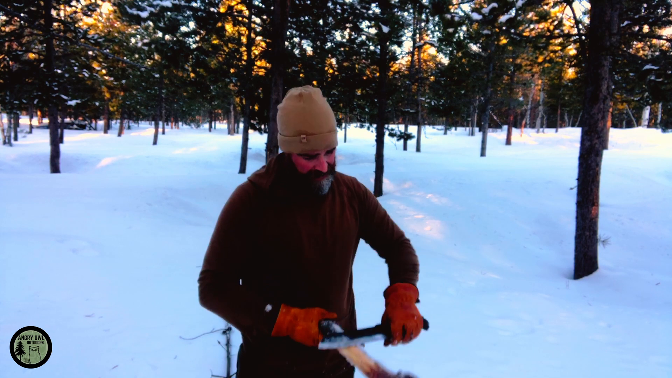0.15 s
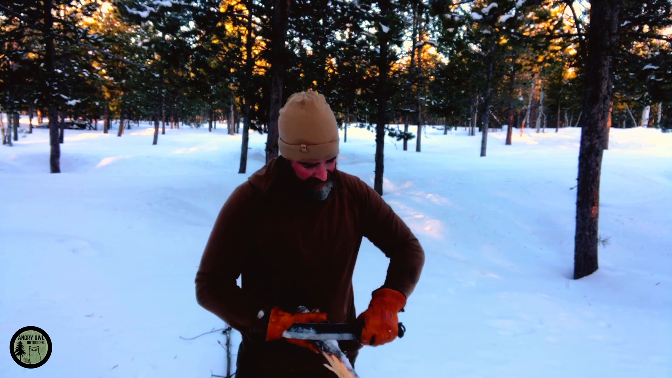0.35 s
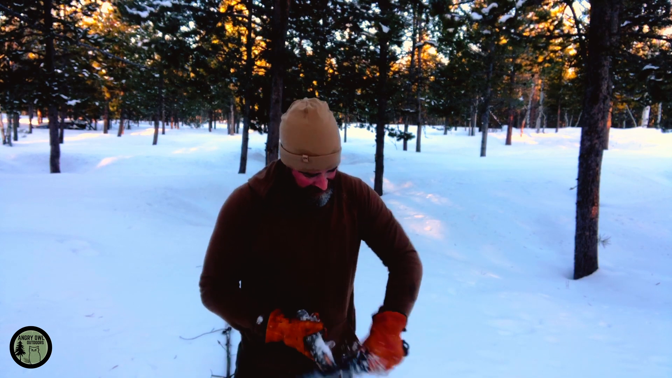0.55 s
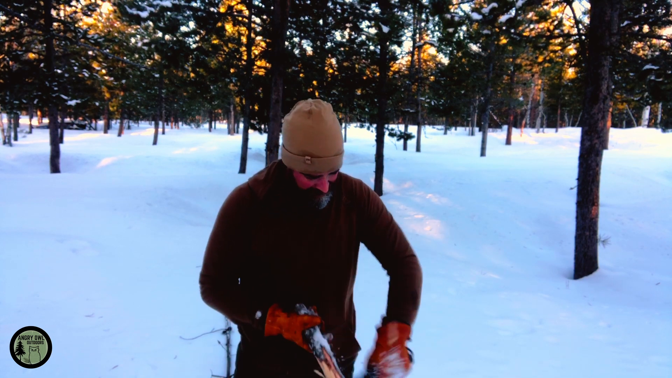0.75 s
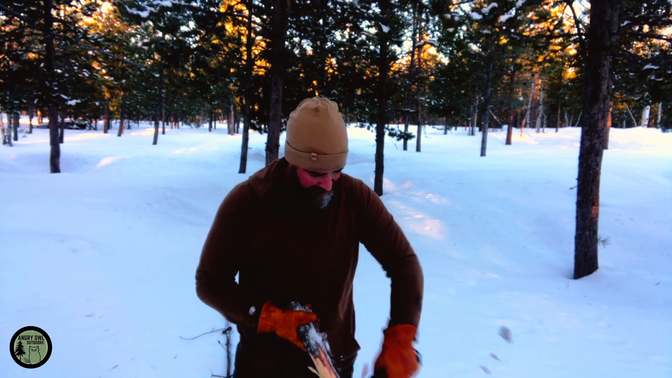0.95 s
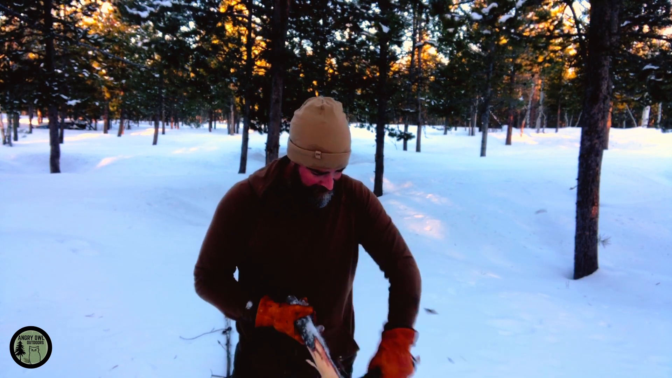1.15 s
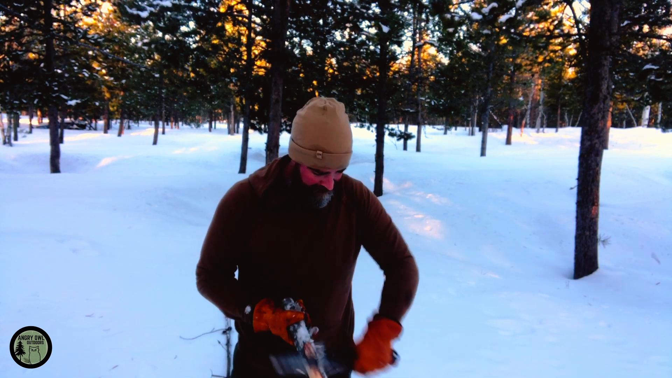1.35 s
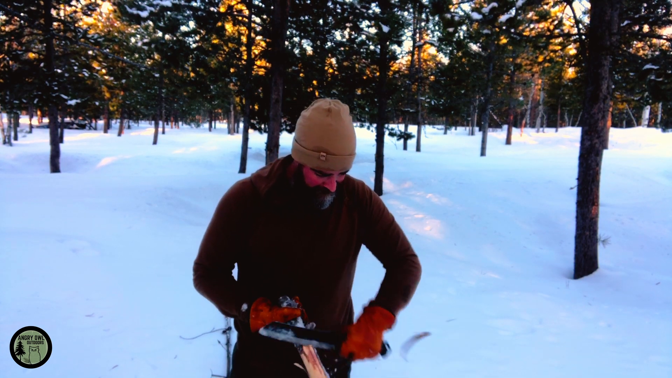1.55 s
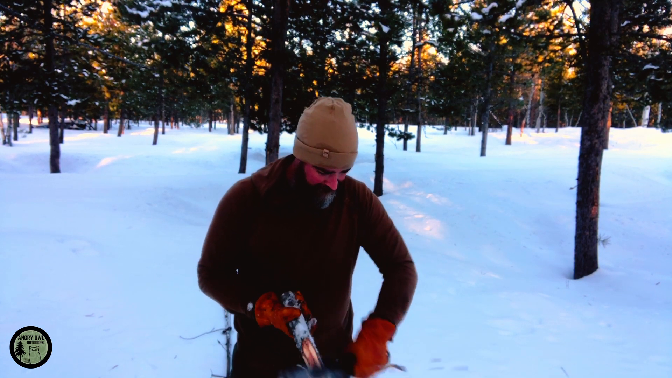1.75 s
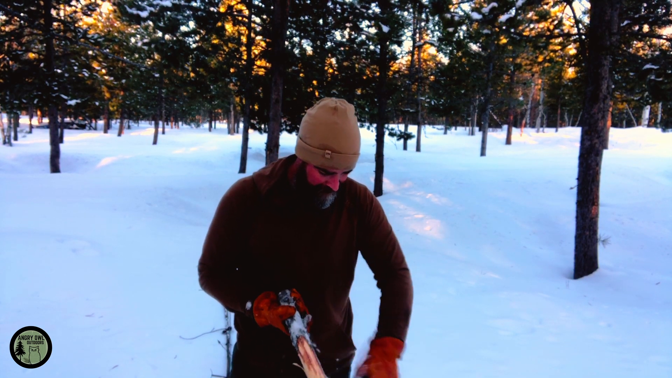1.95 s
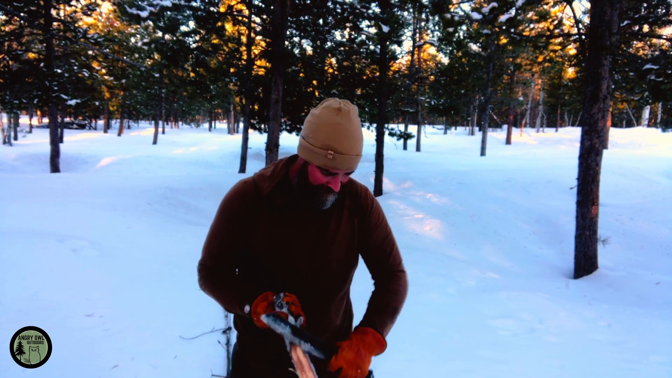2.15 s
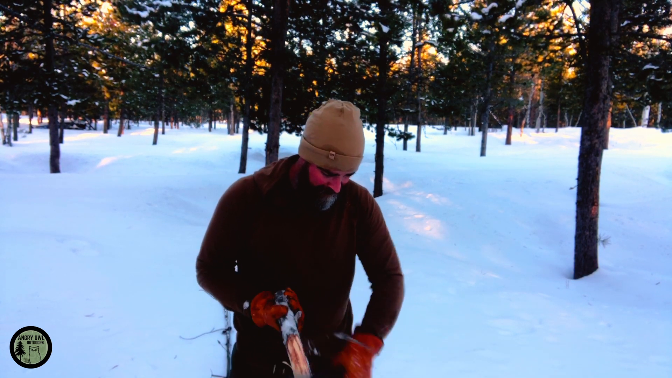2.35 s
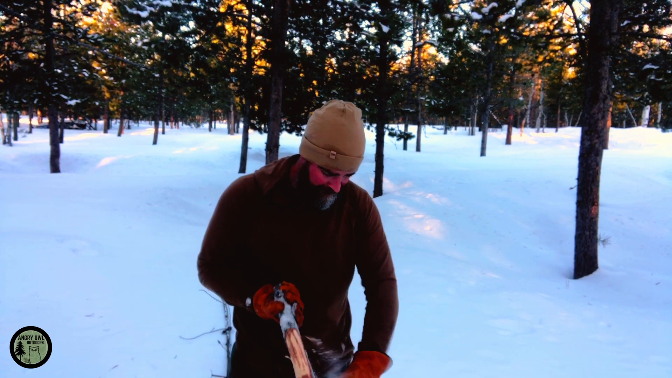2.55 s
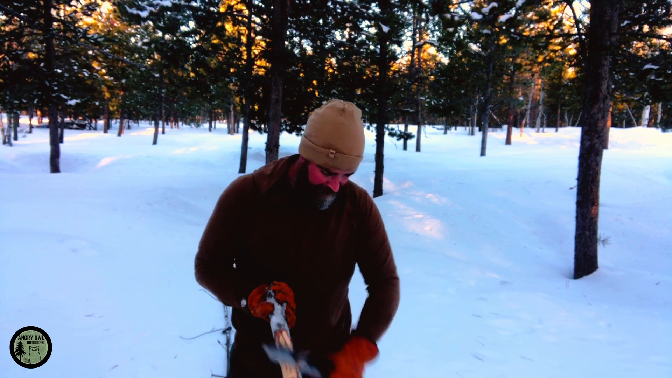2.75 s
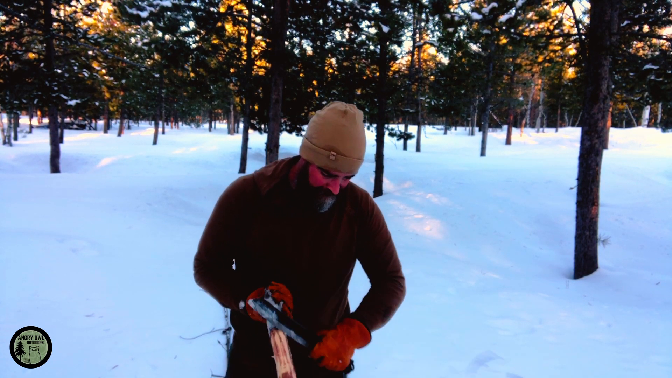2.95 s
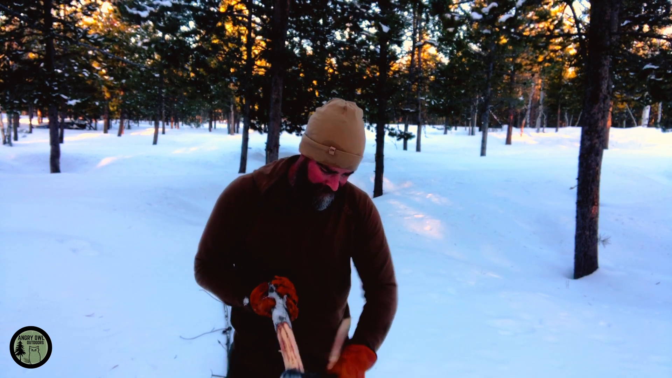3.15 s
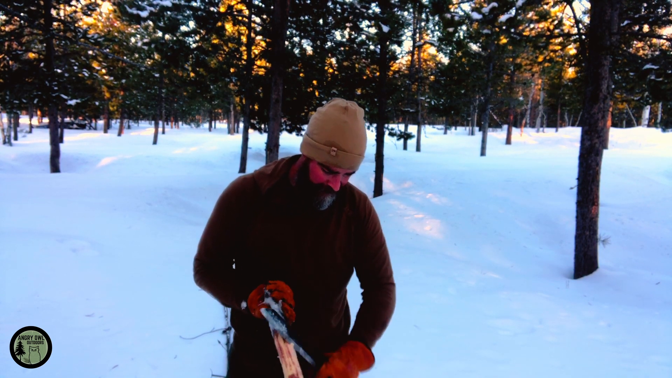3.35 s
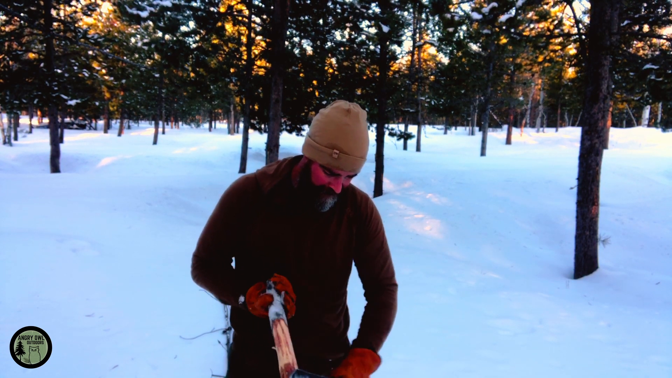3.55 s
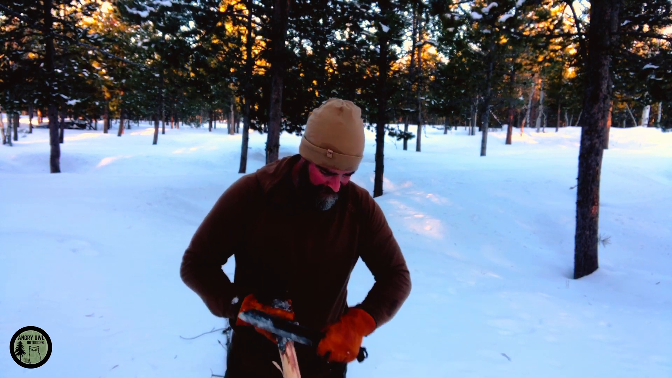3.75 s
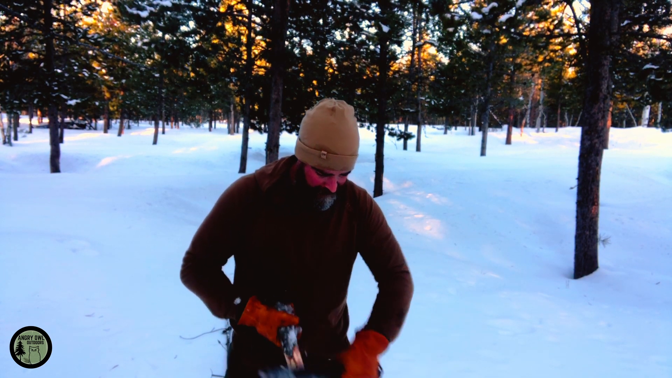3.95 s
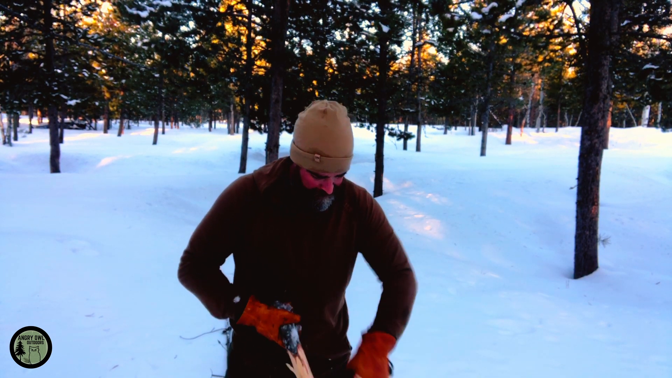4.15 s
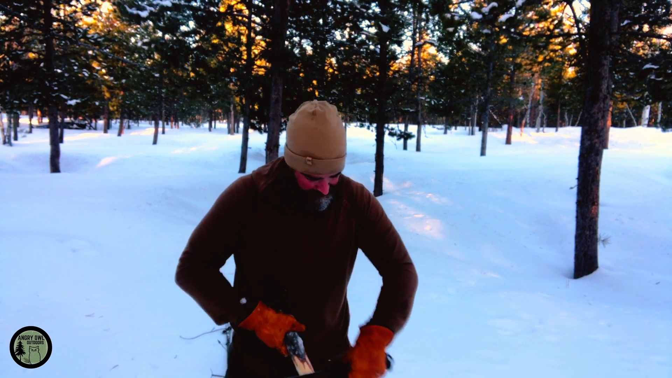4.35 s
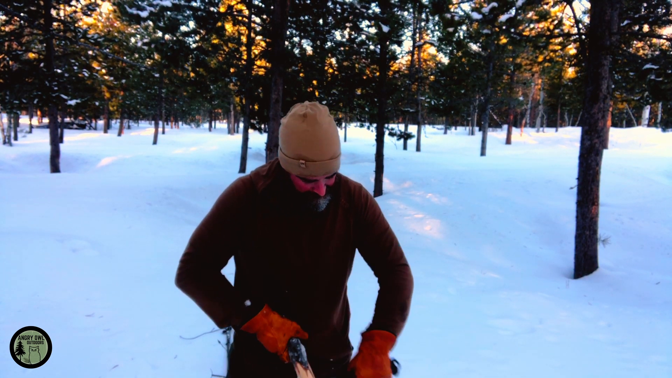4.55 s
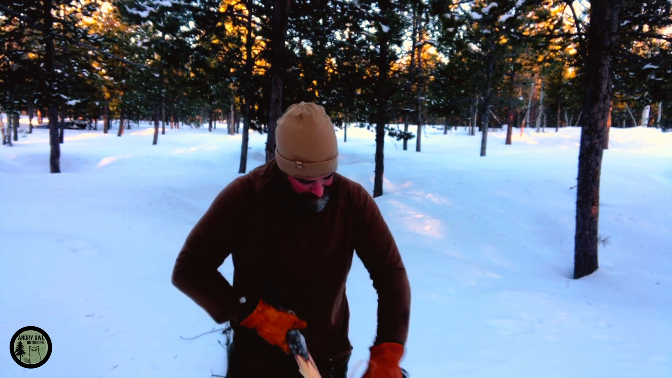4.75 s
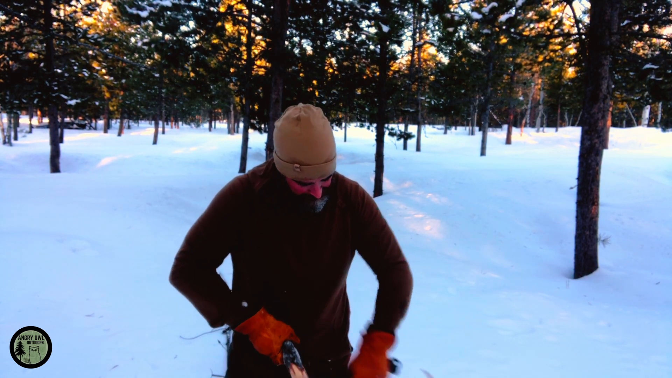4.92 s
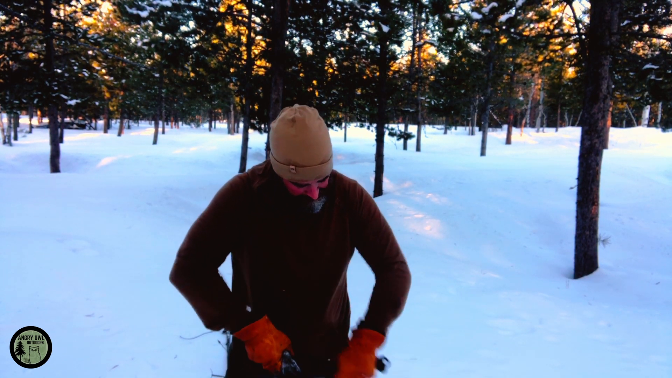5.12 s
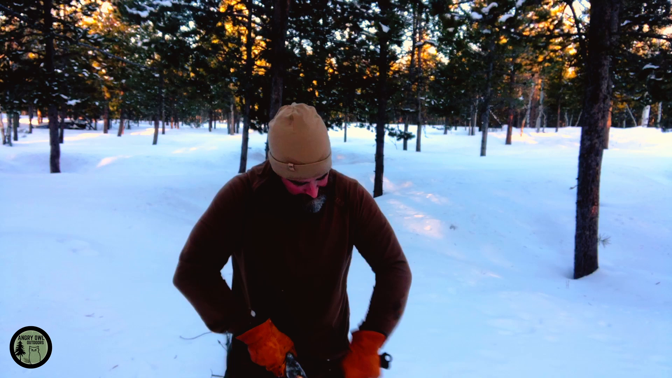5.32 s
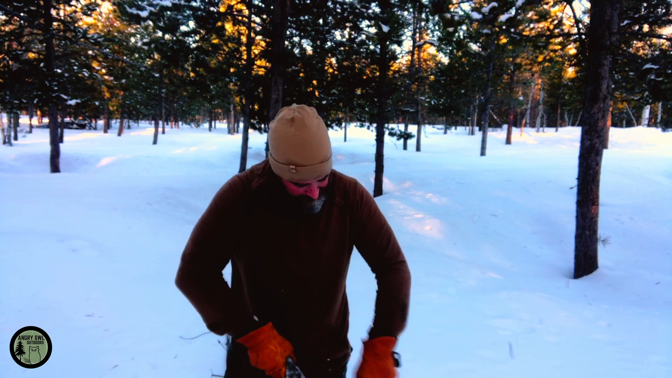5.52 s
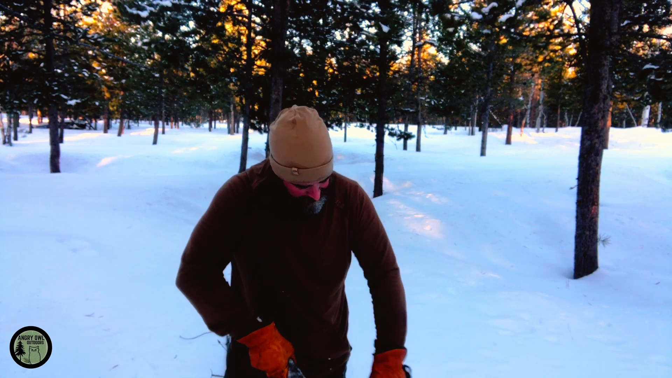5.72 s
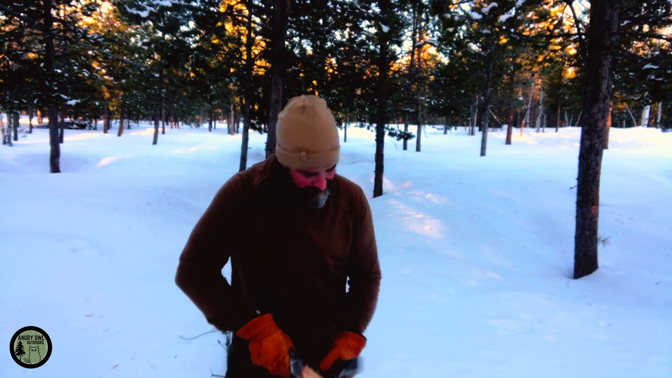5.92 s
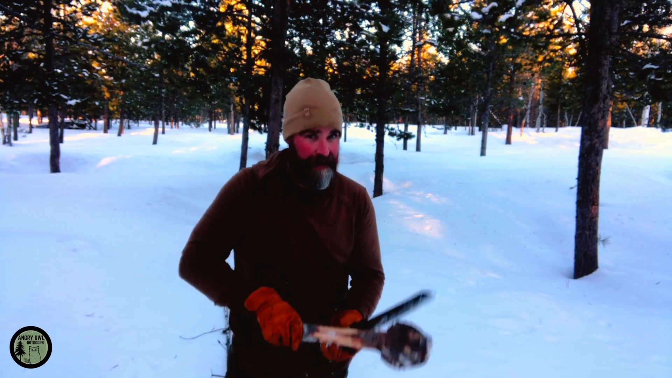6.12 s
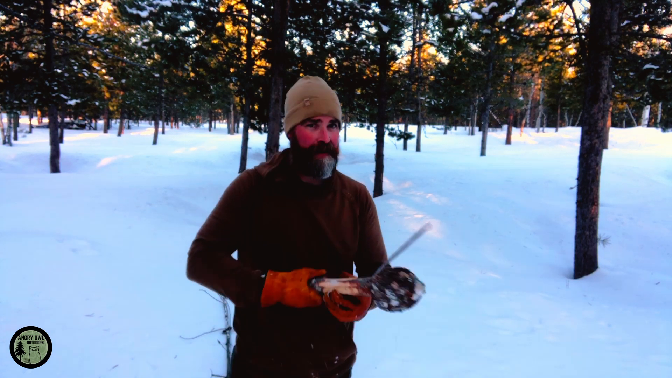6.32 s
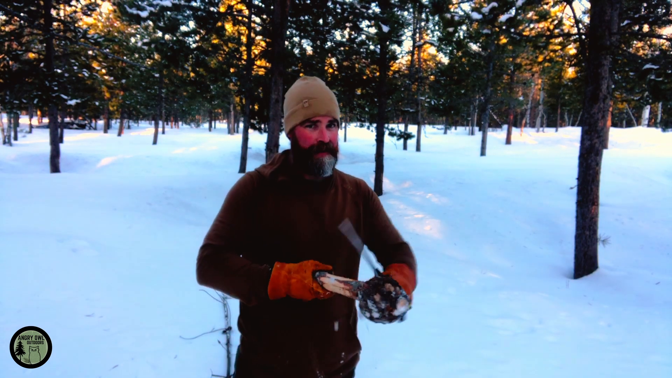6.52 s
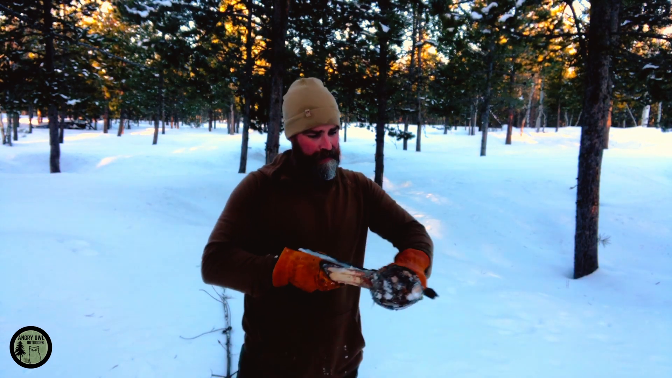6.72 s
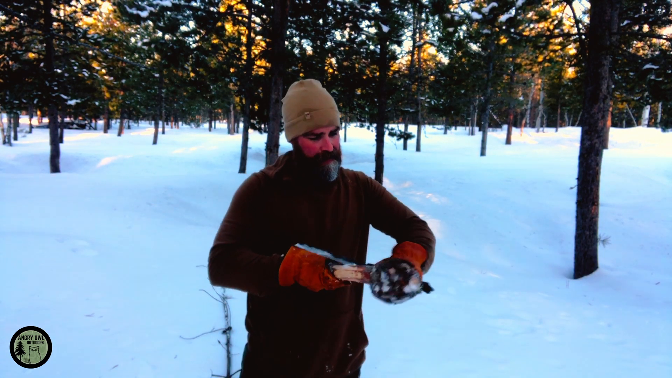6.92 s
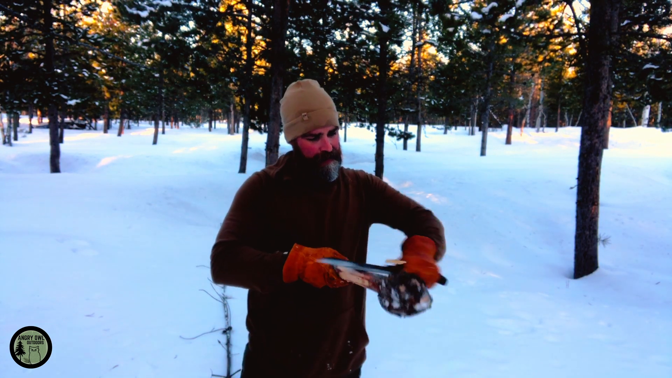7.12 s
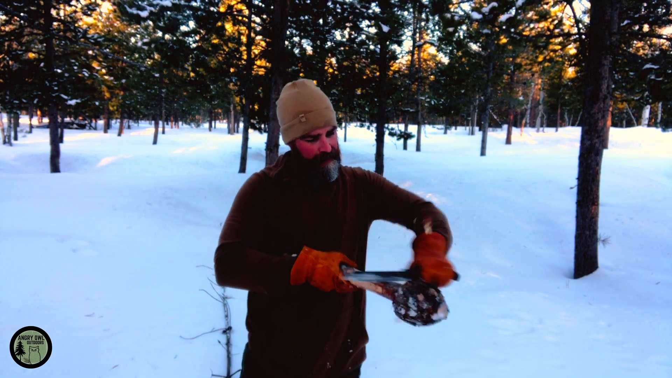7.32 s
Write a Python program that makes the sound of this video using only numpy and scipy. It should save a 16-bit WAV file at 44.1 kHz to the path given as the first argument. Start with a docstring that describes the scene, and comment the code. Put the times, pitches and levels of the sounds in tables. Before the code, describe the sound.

A long knife shaves bark off a hand-held log in quick strokes, dry rasps ending in woody snaps, in a still snowy wood.

```python
"""A long knife shaves bark off a hand-held log in a still, snowy wood; faint air runs throughout.
First a tap on the log and light rubs. Then pushes rasp louder, and most snap a shaving off in a quick
falling chirp from the log; a few only rasp and fade. The blade slides back with a duller rub.
Splinters tick, sleeves brush, the trees echo faintly. After a pause with cloth and taps, one last
shaving snaps off. Scrapes are grains of noise, taps are decaying modes, snaps are delayed pulses."""
import sys
import numpy as np
from scipy import signal
from scipy.fft import rfft, irfft
from scipy.io import wavfile
from scipy.ndimage import map_coordinates

SR = 44100
rng = np.random.default_rng(int(sys.argv[2]) if len(sys.argv) > 2 else 0)


def transcribe(signal):
    """Save signal, clipped to [-1, 1], as a 16-bit WAV file at the path in sys.argv[1]."""
    frames = np.atleast_2d(signal).T
    limited = np.clip(frames, -1, 1)
    pcm = np.round(limited * 32767).astype(np.int16)
    wavfile.write(sys.argv[1], SR, pcm)


N = 325458
TIME = np.arange(N) / SR  # [s]
BINS = np.fft.rfftfreq(4096, 1 / SR)  # [Hz]

# colour of the still air: (frequency [Hz], relative density [dB per Hz])
AIR_COLOUR = [(15, -61.5), (25, -15), (123, -1.5), (149, -10), (200, -6), (236, -8.5), (384, -4),
              (503, -13), (734, -9.5), (796, -16), (2690, -28), (7920, -34.5), (12200, -40.5),
              (16000, -68.5)]
# colour of the sleeve cloth: (frequency [Hz], relative density [dB per Hz])
SLEEVE_COLOUR = [(200, -3.5), (800, -2.5), (1900, -0.5), (3000, -5), (6000, -11), (8500, -4.5),
                 (12000, -11), (15500, -20)]
# sleeves brush as the arms work, lift the log and turn it: (fullest time [s], half length [s], level [dB])
BRUSHES = [(1.9, 1.5, -64), (4.902, 1.56, -64.5), (6.157, .25, -61), (6.35, 0.034, -56), (6.702, 0.38, -70)]
# scattered echo of the wood: (frequency [Hz], energy against the direct sound [dB], t60 [s])
ECHO = [(100, -17.5, .2), (500, -25.5, .2), (2000, -23.5, 0.37), (6000, -19, 0.27), (14000, -27.5, 0.081)]
# splinters at set times, from sharp cracks to faint ticks: (time [s], peak level [dB], pitch [Hz])
SPLINTERS = [(0.5235, -21.5, 10400), (.713, -14, 9950), (.942, -24, 2600), (1.314, -30, 8700),
             (1.3762, -14, 11800), (1.409, -16, 8370), (1.7694, -23, 8730), (2.808, -16, 11000),
             (2.8947, -26, 8490), (3.1143, -20.5, 10500), (3.12, -24.5, 11000), (3.3697, -44, 12400),
             (3.4088, -43.5, 9030), (3.473, -28.5, 11500), (3.643, -35, 8170), (3.6792, -32, 5080),
             (4.7268, -13, 9820), (4.7337, -12, 7590), (4.7413, -5.5, 11900), (4.761, -10, 10800),
             (4.968, -23, 10100), (4.9805, -18, 11200), (5.195, -24, 2600), (5.4125, -24, 11900),
             (5.44, -10, 11400), (5.6827, -10, 10500), (5.7927, -41, 8280), (5.8446, -39, 13200),
             (5.9556, -34.5, 9510), (7.232, -24.5, 5040)]
# the blade taps the log or bumps over a knot: (time [s], peak level [dB], pitch the blow favours [Hz])
TAPS = [(.174, -28.5, 458), (1.073, -32, 540), (3.215, -34.5, 650), (3.679, -35.5, 670),
        (4.211, -32.5, 704), (4.255, -37.5, 463), (4.724, -34, 651), (4.843, -34, 770), (5.063, -34, 790),
        (5.542, -39, 810), (6.601, -28, 643), (6.695, -42.5, 625), (7.073, -35, 837), (7.2315, -33.5, 1100)]
# modes of the tapped log: (frequency [Hz], relative level [dB], t60 [s])
LOG_MODES = [(295, -15.5, 0.024), (386.5, -1, 0.048), (481, 1, 0.033), (688, 0.5, 0.052),
             (856, -1.5, 0.029), (1160, 0, 0.028), (1510, -7.5, 0.019), (2100, -19.5, .022),
             (3070, -14, 0.014), (5040, -15.5, 0.011), (8300, -1, 0.0026), (10800, -17, 0.0077)]
# resonances of blade and log under a scrape: (frequency [Hz], width [Hz], lift [dB])
SCRAPE_MODES = [(820, 200, 6), (1137, 96, 8), (2100, 220, 7), (2925, 450, 6), (5200, 650, 11),
                (8900, 700, 1), (11260, 720, 5.5)]
# the blade slides lightly, mostly on its way back: (start [s], length [s], rasp at full force [dB])
RUBS = [(0.266, 0.13, -56), (.415, 0.086, -49.5), (0.571, 0.072, -50), (.775, 0.093, -42.5), (1, .095, -40),
        (1.12, 0.042, -44), (1.233, 0.088, -39), (1.482, 0.075, -38.5), (1.754, 0.094, -41.5),
        (2.009, .1, -39), (2.1, 0.062, -49.5), (2.385, .08, -41), (2.642, 0.08, -41.5), (2.9, 0.09, -39.5),
        (3.001, .026, -46.5), (3.199, 0.092, -45), (3.678, 0.087, -50), (3.806, 0.04, -52),
        (3.95, 0.11, -46), (4.183, 0.074, -43.5), (4.434, .05, -50), (4.823, 0.089, -46.5),
        (5.049, 0.077, -41.5), (5.279, 0.061, -40.5), (5.513, .058, -39), (5.979, 0.049, -53),
        (7.003, 0.083, -46.5), (7.085, 0.089, -46.5), (7.316, 0.093, -40)]
# colour of a rub: (frequency [Hz], relative density [dB per Hz])
RUB_COLOUR = [(100, -23.5), (380, -5), (800, -4.5), (1150, -15.5), (1500, -17), (2050, -16), (2500, -17.5),
              (3100, -17), (4300, -12), (5200, -20.5), (6200, -28), (8300, -19.5), (11200, -27),
              (15500, -33.5)]
# force along a rub: (start [dB], mid-rise [dB], hardest [dB], mid-fall [dB], end [dB])
RUB_FORCE = [-15, -2.5, -1.5, -5, -17]
# pushes, most ending in a snap; a few only rasp and fade: (break time [s], push length [s],
# wood rasp at full force [dB], fibre hiss at full force [dB], then the break's thump [dB],
# knock [dB], ring [dB] and crack [dB], ring pitch [Hz], time the fibres take to fail [s])
STROKES = [(0.5282, .125, -42.5, -36.5, -73, -55, -71, -58, 1340, 0.005),
           (.734, 0.062, -32.5, -35, -40.5, -38.5, -57, -27, 1390, 0.0022),
           (.955, .06, -36, -40, -38, -32.5, -24, -17.5, 4260, 0.00096),
           (1.1886, 0.069, -37.5, -38, -36, -32, -27, -20.5, 2920, 0.0008),
           (1.4328, .092, -36.5, -30.5, -37, -39, -28, -23.5, 3600, 0.0017),
           (1.6849, 0.062, -32, -27.5, -36.5, -27.5, -30.5, -31.5, 1840, 0.002),
           (1.9508, .065, -34.5, -29, -39, -26.5, -26, -42, 2020, 0.0025),
           (2.2789, 0.065, -37.5, -31, -34, -25, -14.5, -21.5, 2300, 0.0011),
           (2.578, 0.097, -37.5, -33.5, -43, -33, -25.5, -19.5, 3320, 0.0024),
           (2.8322, 0.056, -34, -26, -43, -40.5, -38, -26.5, 4900, 0.0027),
           (3.1459, 0.078, -43.5, -38.5, -43.5, -29, -22, -24.5, 1740, 0.0025),
           (3.5275, .064, -36, -39.5, -39.5, -32.5, -47, -25.5, 1140, 0.00077),
           (3.8974, 0.078, -39, -41.5, -39.5, -36.5, -18.5, -23, 3270, 0.00069),
           (4.1533, 0.063, -39.5, -33.5, -44.3, -53, -44, -53, 1174, 0.0039),
           (4.3313, .06, -46, -52, -43.5, -46.5, -67, -57, 1110, 0.0022),
           (4.5274, 0.061, -46, -49, -46, -56, -76.5, -48, 3180, 0.0025),
           (4.762, .04, -35, -31.5, -38.5, -30, -37.5, -45.5, 1104, .0025),
           (4.9992, 0.047, -32.5, -29, -37.5, -29.5, -22.5, -20.5, 2640, 0.0013),
           (5.224, 0.063, -39, -36.5, -31.5, -27.5, -26, -18, 3420, 0.001),
           (5.4644, .058, -36, -36, -34, -33.5, -30.5, -36, 1690, 0.00084),
           (5.694, .054, -39, -34.5, -68, -65, -58, -48, 3000, 0.0015),
           (7.273, 0.058, -36.5, -33.5, -42, -37, -34, -26, 1760, 0.0031)]
# colour of a push: (frequency [Hz], relative density [dB per Hz])
PUSH_COLOUR = [(100, -17.5), (380, -2), (800, -2), (1150, -6), (1500, -10), (2050, -6), (2500, -8.5),
               (3100, -4.5), (4300, -4), (5200, -3.5), (6200, -9.5), (8300, 2), (11200, -5), (15500, -11.5)]
# force along a push: (start [dB], mid-rise [dB], hardest [dB], mid-fall [dB], end [dB])
PUSH_FORCE = [-21, -13.5, 0, -28.5, -25]
# how log and blade colour a break: (frequency [Hz], relative level [dB])
BREAK_COLOUR = [(80, 0), (150, 0), (240, -2), (330, -2.5), (500, 4), (800, 0), (1400, -0.5), (2000, 2),
                (2550, -9), (3700, -0.5), (5200, -2), (6300, -6.5), (8500, 3.5), (11000, 5.5), (13000, -1)]

AIR_DB = -58.5
CRUMB_FIRST_S, CRUMB_LAST_S, CRUMBS_PER_S = .6, 6.1, 3
CRUMB_DB, CRUMB_SPREAD_DB, CRUMB_HZ = -41.5, 6, 9000
RUB_PEAK_SHARE = 0.38  # a rub is hardest this far along
FIRM_RASP_DB, FIRM_HISS_DB, HISS_SLOPE = -40, -46, 0.83  # a rub's hiss follows its rasp [dB per dB]
EASE_RATIO = 4.0  # the push peaks this many failing times before the break
FOLLOW_THROUGH_S = .034  # the blade runs on after the break
EDGE_HZ = 16000


def gain_of(db):
    """Decibels to a linear gain."""
    return 10 ** (np.asarray(db) / 20)


def evened(x):
    """The signal scaled to an RMS of one."""
    return x / np.sqrt(np.mean(x ** 2) + 1e-20)


def read(points, hz):
    """A spectrum joined by straight lines on a log-frequency axis."""
    f, value = np.transpose(points)
    return np.interp(np.log(hz + 1), np.log(f + 1), value)


def add(mix, s, sound):
    """Mix a sound in at s seconds, cut off where the mix ends."""
    part = mix[max(round(s * SR), 0):][:len(sound)]
    part += sound[:len(part)]


def causal(gain):
    """The spectrum of the promptest pulse that has this gain (minimum phase)."""
    log_gain = np.log(np.maximum(gain, 1e-5 * gain.max()))
    circle = np.r_[log_gain, log_gain[-2:0:-1]]
    phase = -signal.hilbert(circle).imag[:len(gain)]
    return gain * np.exp(1j * phase)


def coloured(x, gain):
    """The signal filtered by a gain curve over BINS."""
    return signal.oaconvolve(x, irfft(causal(gain)))[:len(x)]


def wobble(axis, per_unit):
    """A smooth random curve of RMS one along an axis, with so many bends per unit."""
    at = (axis - axis[0]) * per_unit
    return evened(map_coordinates(rng.standard_normal(512), [at], order=3, mode="wrap"))


def ripple(depth_db, per_octave=4):
    """The resonances of log and shaving differ with each place that the blade touches."""
    return gain_of(depth_db * wobble(np.log2(BINS + 300), per_octave))


def still_air():
    """Faint steady air: noise with a fixed colour."""
    air = coloured(rng.standard_normal(N), gain_of(read(AIR_COLOUR, BINS)))
    return gain_of(AIR_DB) * evened(air)


def sleeves():
    """Cloth brushes as the arms move: fluttering noise that swells with each motion."""
    cloth = rng.standard_normal(N) * gain_of(3.67 * wobble(TIME, 60))
    cloth = evened(coloured(cloth, gain_of(read(SLEEVE_COLOUR, BINS))))
    motion = sum(gain_of(db) ** 2 / (1 + ((TIME - s) / half_s) ** 8) for s, half_s, db in BRUSHES)
    return cloth * np.sqrt(motion)


def woodland(x, bounce_db=-25, bounce_top_hz=6000, bounce_s=.0178):
    """One near reflection, dulled by rough bark, and a thin scatter from the trunks."""
    echo = np.array(ECHO)
    hz, t, z = signal.stft(rng.standard_normal(SR // 2), SR, nperseg=256)
    level_db = read(echo[:, :2], hz)[:, None]
    t60 = read(echo[:, [0, 2]], hz)[:, None]
    unit_energy = np.sqrt(np.log(1e6) / (t60 * SR))  # long and short decays carry equal energy
    z = z * gain_of(level_db - 60 * t / t60) * unit_energy
    tail = signal.istft(z, SR, nperseg=256)[1]
    bounce = irfft(causal(1 / np.hypot(1, BINS / bounce_top_hz)))
    add(tail, bounce_s, gain_of(bounce_db) * bounce)
    return signal.oaconvolve(x, tail)[:N]


def crumbs():
    """Faint splinters and crumbs of bark at random, as rows (time [s], peak level [dB], pitch [Hz])."""
    span_s = CRUMB_LAST_S - CRUMB_FIRST_S
    rows = []
    for when, size, pitch in rng.uniform(-1, 1, (round(CRUMBS_PER_S * span_s), 3)):
        s = CRUMB_FIRST_S + span_s * abs(when)
        rows.append((s, CRUMB_DB + CRUMB_SPREAD_DB * size, CRUMB_HZ * 2 ** (pitch / 2)))
    return rows


def splinter(row, width_hz=5500, body_share=0.03, strain_s=0.0039, drag_s=0.0051, skirt=0.14):
    """A stiff fibre strains, cracks round its own pitch and drags its neighbours after it."""
    s, peak_db, hz = row
    t = np.arange(-256, 768) / SR
    crack = (t >= 0) * np.exp(-abs(t) / 0.00033)
    neighbours = skirt * np.exp(-np.maximum(-t / strain_s, t / drag_s))
    burst = rng.standard_normal(len(t)) * (crack + neighbours)
    tick = coloured(burst, 1 / (1 + (2 * (BINS - hz) / width_hz) ** 2) + body_share)
    return s + t[0], gain_of(peak_db) * tick / abs(tick).max()


def tap(row, lag_s=0.001954, rattle=0.3, focus_db=4, lowest_hz=250):
    """A light blow rings the log, the low modes a little later; the blade rattles briefly."""
    s, peak_db, blow_hz = row
    t = np.arange(4096) / SR
    ring = 0
    for hz, db, t60 in LOG_MODES:
        age = np.maximum(t - lag_s * 1000 / hz, 0)  # lag_s holds at 1 kHz
        favour_db = focus_db * np.exp(-2 * np.log2(hz / blow_hz) ** 2)
        ring = ring + gain_of(db + favour_db - 60 * age / t60) * np.sin(2 * np.pi * hz * age)
    blow = rattle * rng.standard_normal(len(t)) * np.exp(-t / 0.0032)
    blow[0] = 4  # the first contact
    ring = signal.fftconvolve(ring, blow)[:len(t)]
    ring = signal.sosfilt(signal.butter(2, lowest_hz, "high", fs=SR, output="sos"), ring)
    return s, gain_of(peak_db) * ring / abs(ring).max()


def stroke(row, colour, shape, grains_per_s, grain_db, chatter_hz, chatter_db, ripple_db, split_hz=5000):
    """Fibres break one by one under a chattering edge and sound through the log."""
    start, hardest, end, rasp_db, hiss_db = row
    t = np.arange(start - .008, end + .02, 1 / SR)
    phases = [t[0], start, (start + hardest) / 2, hardest, (hardest + end) / 2, end, t[-1]]
    force = gain_of(np.interp(t, phases, [-45, *shape, -45]))

    sign, size = rng.standard_normal(len(t)), rng.exponential(1, len(t))
    breaks = rng.random(len(t)) < grains_per_s / SR
    fibres = sign * gain_of(grain_db * np.minimum(size, 4)) * breaks
    chatter = gain_of(chatter_db * wobble(t, 2 * chatter_hz))
    fibres = force * fibres * chatter

    lift_db = sum(db / (1 + (2 * (BINS - hz) / width) ** 2) for hz, width, db in SCRAPE_MODES)
    body = gain_of(read(colour, BINS) + lift_db)
    # as the edge travels it passes from one place on the log to the next, each with its own resonances
    place = (t - start) / .04
    sound = 0
    for k in range(5):
        contact = np.sqrt(np.maximum(1 - abs(place - k), 0))
        sound = sound + coloured(fibres * contact, body * ripple(ripple_db, per_octave=7))

    # wood rasp below the split, fibre hiss above it
    low = 1 / (1 + (BINS / split_hz) ** 8)
    rasp, hiss = evened(coloured(sound, low)), evened(coloured(sound, 1 - low))
    mean_force = np.sqrt(np.mean(force ** 2))
    return t[0], (gain_of(rasp_db) * rasp + gain_of(hiss_db) * hiss) * mean_force


def rubs():
    """The unloaded blade swells and fades over the wood with a duller sound."""
    out = np.zeros(N)
    for s, length_s, rasp_db in RUBS:
        hiss_db = FIRM_HISS_DB + HISS_SLOPE * (rasp_db - FIRM_RASP_DB)
        rub = s, s + RUB_PEAK_SHARE * length_s, s + length_s, rasp_db, hiss_db
        add(out, *stroke(rub, RUB_COLOUR, RUB_FORCE, grains_per_s=12000, grain_db=2.5,
                         chatter_hz=119.6, chatter_db=4.0, ripple_db=3.5))
    return out


def fracture(lead_s, fail_s, tear_db=-20, tear_s=0.012, rough=1.47):
    """Spectrum of a break: a growing tear, one clean release, and a crowd of fibres failing round it."""
    t = np.arange(4096) / SR - lead_s
    crowd = np.exp(-abs(t / fail_s) ** 1.2)
    tear = gain_of(tear_db) * np.exp(-np.maximum(-t / tear_s, t / .003))
    fibres = (crowd + tear) * rng.standard_normal(len(t))
    fibres = rfft(fibres) / np.linalg.norm(fibres)
    small = BINS ** 2 / (BINS ** 2 + 900 ** 2)  # single fibres carry no bass
    share = rough * np.sqrt(fail_s / 0.0012)  # a slow break is mostly crowd
    release = np.exp(-2j * np.pi * BINS * lead_s)
    return release + share * small * fibres


def snap(row, lag_s=.0021, lag_power=0.93, ring_q=6, ring_db=6, lead_s=.02):
    """The load lets go at once; slow bass bending waves arrive after the treble, as a chirp."""
    s, *levels_db, ring_hz, fail_s = row
    source = fracture(lead_s, fail_s)
    ring = 1 + gain_of(ring_db) / np.hypot(1, 2 * ring_q * (BINS / ring_hz - 1))
    body = gain_of(read(BREAK_COLOUR, BINS)) * ring * ripple(2.36)
    edges_hz = [75, 280, 1200, 6000, 12800]  # thump, knock, ring and crack lie between these
    power = 0
    for db, lo, hi in zip(levels_db, edges_hz, edges_hz[1:]):
        band = body ** 2 / (1 + (lo / (BINS + 1)) ** 6) / (1 + (BINS / hi) ** 8)
        power = power + gain_of(db) ** 2 * band / np.mean(band * abs(source) ** 2)
    # each frequency's delay, summed over frequency into phase
    lag = lag_s * (1000 / (BINS + 25)) ** lag_power
    bending = np.exp(-2j * np.pi * np.cumsum(lag) * BINS[1])
    sound = irfft(source * causal(np.sqrt(power)) * bending)
    return s - lead_s, sound * np.sqrt(.005 * SR)  # band levels count as RMS over 5 ms


def shavings():
    """Each push builds up and eases as the fibres begin to fail; most snap, a few only rasp and fade."""
    out = np.zeros(N)
    for s, push_s, rasp_db, hiss_db, *snap_db, ring_hz, fail_s in STROKES:
        push = s - push_s, s - EASE_RATIO * fail_s, s + FOLLOW_THROUGH_S, rasp_db, hiss_db
        add(out, *stroke(push, PUSH_COLOUR, PUSH_FORCE, grains_per_s=10000, grain_db=0.5,
                         chatter_hz=220.2, chatter_db=4, ripple_db=4))
        # near silent where the push only fades
        add(out, *snap((s, *snap_db, ring_hz, fail_s)))
    return out


def scene():
    """Shaving strokes, rubs, taps and splinters, heard in the open wood."""
    still = still_air() + sleeves()
    knife = shavings() + rubs()
    for row in TAPS:
        add(knife, *tap(row))
    for row in SPLINTERS + crumbs():
        add(knife, *splinter(row))
    return (knife + woodland(knife) + still)[None]


def record(dry):
    """A steep low-pass closes off the top of the treble."""
    low_pass = signal.firwin(255, EDGE_HZ, window=("kaiser", 9), fs=SR)
    return signal.oaconvolve(dry, low_pass[None], "same")


dry = scene()
out = record(dry)
transcribe(out)
```